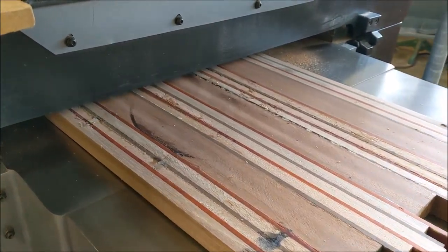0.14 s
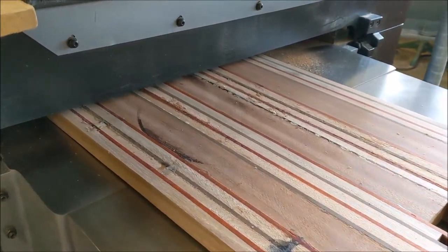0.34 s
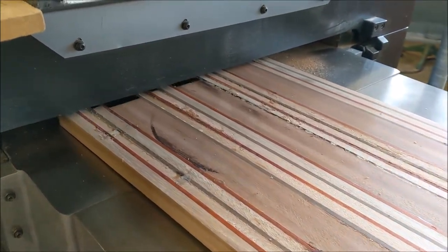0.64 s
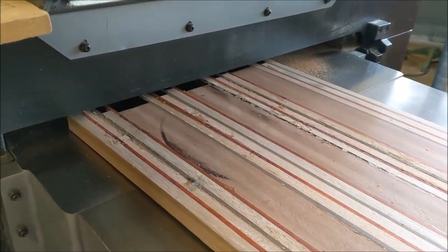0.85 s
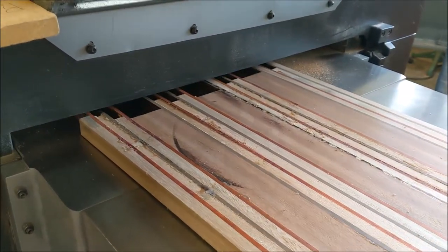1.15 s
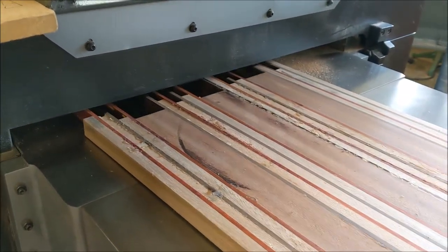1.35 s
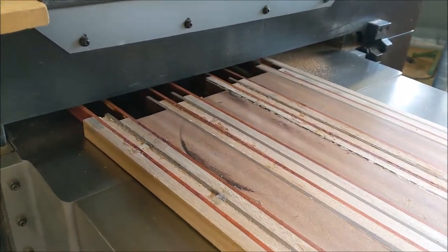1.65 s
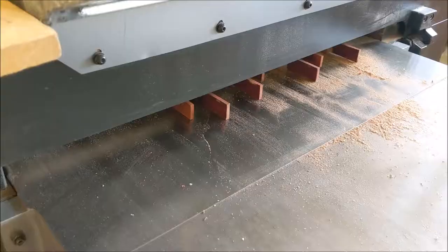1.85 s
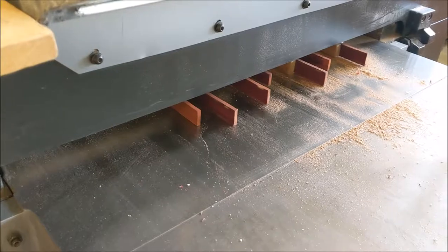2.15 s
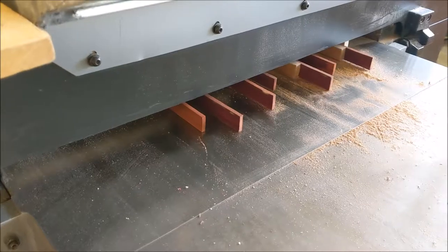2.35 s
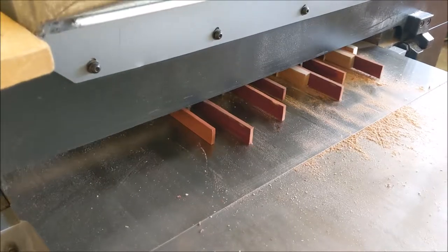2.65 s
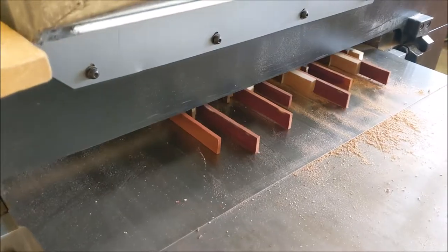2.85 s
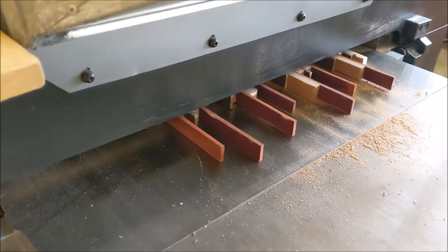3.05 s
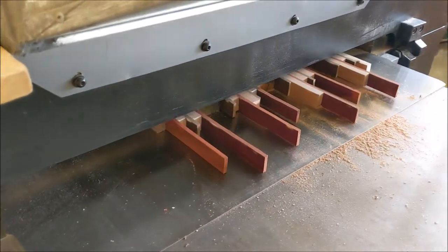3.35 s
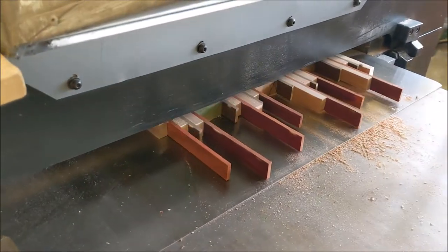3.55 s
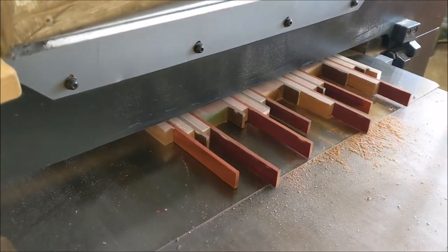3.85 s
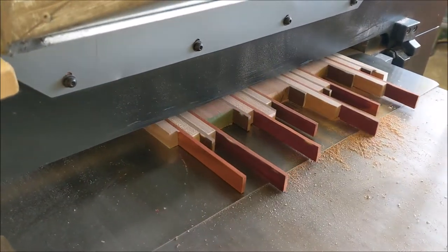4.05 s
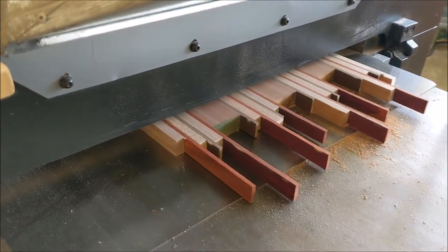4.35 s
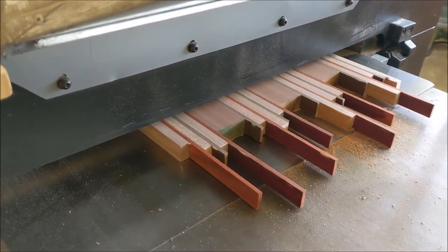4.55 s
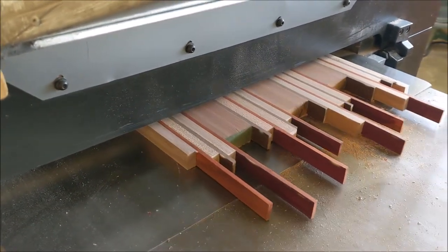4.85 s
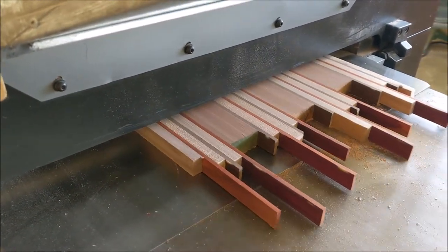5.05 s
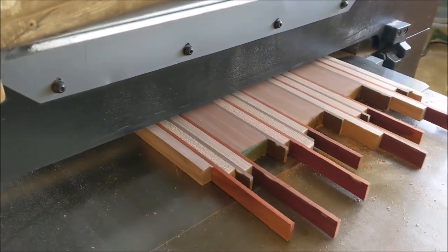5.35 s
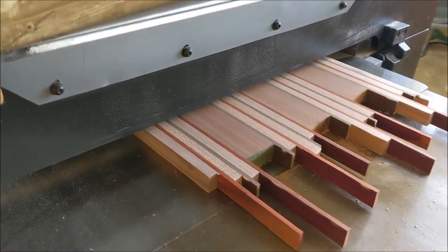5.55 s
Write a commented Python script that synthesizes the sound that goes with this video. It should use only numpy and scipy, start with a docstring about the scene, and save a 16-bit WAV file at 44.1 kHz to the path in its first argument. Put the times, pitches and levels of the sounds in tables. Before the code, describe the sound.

Close at a thickness planer's table in a woodshop, stereo. For almost two seconds it only idles: a broad airy extractor rush, faint motor hum and thin high whistle. A short hollow knock follows, the air dips, and the knives' loud buzzing howl swells in within half a second, then broadens into a fuller, hissier screech as the cut widens, continuing to the end.

```python
"""Thickness planer in a woodshop, heard close by at its table.
It idles: coloured noise for the extractor's air rush, wavering sines for motor, fan and bearings.
At 1.84 s a short hollow ping (decaying sines); the air level dips and a low hum follows.
From 1.85 s the sound of six rows of knives in a glued board swells in, first its end strips, then gradually
its full width: harmonics of the turning rate howl and screech, noise throbbing with the block makes chips hiss."""
import sys
import numpy as np
from scipy import signal
from scipy.fft import rfft, irfft, next_fast_len
from scipy.io import wavfile
from scipy.ndimage import uniform_filter1d, map_coordinates

SR = 44100
rng = np.random.default_rng(int(sys.argv[2]) if len(sys.argv) > 2 else 0)


def output_pcm(signal):
    """Save a mono or channel-first signal as 16-bit PCM at the path in sys.argv[1].

    Samples are clipped to [-1, 1] before scaling.
    """
    pcm = np.clip(np.atleast_2d(signal).T, -1, 1) * 32767
    wavfile.write(sys.argv[1], SR, np.round(pcm).astype(np.int16))


N = 250929
TIME = np.arange(N) / SR
FRAMES = np.linspace(0, N / SR, 300)  # s, slow grid for the line strengths

# noise likeness of left and right: f/Hz, correlation
ALIKE = [(60, 0.77), (150, 0.97), (400, 0.84), (800, 0.74), (1400, 0.66), (3000, 0.35), (6000, 0.079)]
# left-right balance: f/Hz, L-R/dB
LEAN = [(100, -1), (400, 2.5), (1500, 4), (4000, -0.5), (9000, 3), (11500, 1.5), (15000, 8.5)]
# air rush spectrum: f/Hz, relative density/dB
AIR = [(20, -31), (55, -12.5), (90, -14), (170, -12), (260, -5), (430, -3), (580, -8.5), (950, -9),
       (1300, -14.5), (2200, -13), (3500, -19.5), (4400, -21.5), (4900, -26.5), (6600, -28.5),
       (10500, -33.5), (15500, -38)]
# resonances in the air stream: f/Hz, width/Hz, lift/dB
HOOD = [(5580, 660, 7), (11800, 500, 0), (15100, 1500, 8.5)]
# air past a narrow gap: f/Hz, relative density/dB
WHISTLE = [(6500, -47), (7300, -4.5), (7470, -7), (7580, -1), (7720, 0), (7900, -9), (8200, -5),
           (9200, -35)]
# tones of motor, fan and bearings: f/Hz, relative level/dB, L-R/dB
MOTOR = [(58.6, -65.5, 5), (161, -58.5, 0), (204.6, -55, 1), (252.6, -56, -1), (331.4, -54, -1),
         (488, -48.5, 10), (665.5, -58.5, -6), (954, -57.5, -4), (988, -58.5, 2), (1208, -61, 7),
         (1487, -57.5, -9), (1513, -63.5, -28), (1684, -59.5, 6), (1770, -76, -11), (1890, -77, 3),
         (2220, -59, 0), (3000, -64, 12), (3820, -69, 7)]
# level of the running machine, dips briefly as the cutting sound starts: t/s, level/dB
AIR_LEVEL = [(0, -38.5), (1.835, -37.5), (1.855, -48), (1.93, -54), (2.12, -41), (3, -42.5), (5.69, -42)]
# brief pings: t/s, f/Hz, level/dB, rise/s, t60/s
PINGS = [(1.837, 445, -23, .0015, .15), (1.838, 3400, -46, .004, .3), (1.87, 1170, -28, .008, .06),
         (1.881, 1745, -28, .004, .04)]
# short low hum: t/s, level/dB
HUM = [(1.85, -100), (1.89, -54.5), (2.01, -44), (2.04, -100)]
# speed of the block, slightly slower under load: t/s, rate/(turns/s)
SPEED = [(3.18, 80.8), (3.42, 80.46), (4.35, 80.46), (4.6, 80.78), (4.85, 80.85), (5.3, 80.85),
         (5.55, 80.57)]
# tearing fibres: f/Hz, relative density/dB
TEARING = [(400, -24), (800, -10), (1500, 0), (2000, -2.5), (2500, -8.5), (3100, -10), (4500, -18),
           (8000, -30)]
# chip hiss: f/Hz, relative density/dB
CHIPS = [(1000, -20), (2500, -9), (3200, -3), (4000, -4.5), (4700, -11), (5350, -1), (5800, 5.5),
         (6550, -6), (7700, 0.5), (9000, -5.5), (11000, -2.5), (12000, 0.5), (13200, -3), (15000, 2),
         (15700, -2)]
# share of the cutting noise that recurs a turn later: f/Hz, share
REPEAT = [(800, .3), (2500, .42), (7000, .42), (10000, .28), (15000, .2)]
# lead of the cut's tones at the left port: f/Hz, phase/rad
LEAD = [(100, 0), (500, .5), (1000, 1.2), (1450, 1.4), (1900, .8), (3500, .7), (8000, 1.3)]
# howl lines: order of the turning rate, relative level in strips/dB, in full width/dB, L-R/dB
HOWL = [(3, -21, -12, 0), (4, -13, -10.5, 1), (6, -15, -16, 6), (7, -21, -17, 3), (8, -23, -23, 2),
        (9, -16.5, -22, 4), (10, -13, -21, 4), (11, -12.5, -11, 3), (14, -26, -12.5, 2), (15, -22, -18, 3),
        (17, -9.5, -9.5, 2), (20, -18, -18, 1), (21, -6, -9, -2), (26, -14, -13.5, 3), (27, -13, -20, 1),
        (28, -7, -10.5, 7), (29, -18, -15, 3), (31, -18, -11, -2), (32, -17, -19, 5), (33, -17, -24, -1),
        (34, -13.5, -12.5, 7), (35, -14, -10.5, 4), (37, -20, -18, 2), (38, -24, -19, -1),
        (39, -24, -11, 5), (41, -20, -14, 2), (42, -14, -8.5, 1)]
# singing harmonics, swelling and fading as the board slides; each: t/s, level before swell-in gain/dB
ORDER_12 = [(1.93, -34.5), (2.25, -38), (2.41, -49), (2.73, -45.0), (3.13, -54), (3.37, -42), (4.09, -40.5),
            (4.41, -49), (4.57, -38), (5.13, -29.5), (5.65, -29.5)]
ORDER_13 = [(1.93, -36.5), (2.73, -42), (3.05, -35), (3.13, -45), (3.93, -38.5), (4.33, -41.5),
            (4.57, -36.5), (4.65, -42.0), (5.65, -34.5)]
ORDER_16 = [(1.93, -30), (2.33, -35.5), (2.73, -37), (3.37, -44), (3.69, -40), (4.33, -46), (4.49, -44.5),
            (5.65, -43.5)]
ORDER_18 = [(1.93, -31), (2.17, -32.5), (2.33, -29.5), (2.65, -34.5), (3.05, -25), (3.69, -33.5),
            (3.77, -34.5), (4.01, -34.5), (4.33, -45), (4.65, -27.5), (4.73, -54), (4.89, -37), (5.21, -38),
            (5.65, -33.5)]
ORDER_19 = [(1.93, -40), (2.01, -58), (2.57, -40), (2.97, -41), (3.05, -41.5), (3.85, -36.5), (4.33, -38),
            (4.73, -35.5), (5.65, -40.5)]
ORDER_22 = [(1.93, -38), (2.25, -33.5), (2.57, -44), (2.81, -34), (3.05, -47), (3.45, -39.5), (4.01, -48),
            (4.17, -41.5), (5.65, -85)]
ORDER_23 = [(1.93, -50.5), (2.33, -38), (2.81, -35.5), (2.89, -47), (3.29, -42), (3.53, -58), (5.37, -48),
            (5.65, -40.5)]
ORDER_24 = [(1.93, -45.0), (2.01, -35.5), (2.73, -38), (2.89, -33.5), (3.13, -31.5), (4.09, -52),
            (4.65, -36), (5.13, -45), (5.29, -37.5), (5.65, -48.5)]
ORDER_25 = [(1.93, -42), (2.09, -33), (2.41, -51), (3.77, -44), (4.01, -56.5), (4.17, -54), (4.49, -40),
            (4.57, -59), (5.65, -47)]
ORDER_30 = [(1.93, -38), (2.41, -52), (2.57, -39.5), (3.29, -38.5), (3.53, -50), (4.09, -57), (4.17, -40.5),
            (5.21, -39), (5.65, -45.0)]
ORDER_36 = [(1.93, -44), (2.49, -40), (3.21, -53), (3.29, -40.5), (4.01, -42), (4.49, -36.5), (4.57, -50),
            (5.29, -57), (5.45, -34), (5.65, -48)]
ORDER_40 = [(1.93, -41.5), (3.61, -62.5), (4.09, -41), (4.25, -48.5), (4.49, -42.5), (5.13, -42.5),
            (5.29, -38.5), (5.45, -65), (5.65, -65)]
ORDER_48 = [(1.93, -44), (3.13, -47), (3.29, -38.5), (3.85, -45), (4.25, -37), (4.49, -51), (4.57, -40.5),
            (5.21, -42), (5.65, -43)]
ORDER_70 = [(1.93, -46.5), (3.05, -51), (3.21, -31.5), (3.45, -45), (4.33, -48), (4.49, -32.5), (4.57, -54),
            (4.89, -32.5), (5.37, -37), (5.65, -54)]
ORDER_72 = [(1.93, -44.0), (2.09, -37.5), (2.17, -43), (2.49, -43.5), (3.05, -46.5), (3.13, -40),
            (3.21, -52), (5.29, -41), (5.65, -44)]
ORDER_94 = [(1.93, -60), (2.89, -41), (3.29, -62), (4.41, -50), (4.57, -37), (4.73, -54), (5.65, -51.0)]
# the singers: order, level curve (t/s, level/dB), L-R/dB, left lead/rad
SINGERS = [(12, ORDER_12, -2, 1), (13, ORDER_13, -2, 1.1), (16, ORDER_16, 1, 1.2), (18, ORDER_18, -3, 1.5),
           (19, ORDER_19, 2, 1.1), (22, ORDER_22, 4, 0), (23, ORDER_23, 4, -.4), (24, ORDER_24, 2, 1.6),
           (25, ORDER_25, 3, .2), (30, ORDER_30, 3, 1.6), (36, ORDER_36, 3, .7), (40, ORDER_40, 2, -.7),
           (48, ORDER_48, -5, 2.6), (70, ORDER_70, 3, 2.2), (72, ORDER_72, 0, 0), (94, ORDER_94, 5, 1.3)]
# comb of harmonics under the whine: f/Hz, relative level/dB
SCREECH = [(3500, -18), (4300, -18.5), (4900, -21), (5800, -14), (6500, -22), (7600, -17), (8400, -20.5),
           (10000, -20.5), (11200, -25), (13000, -28), (15000, -24), (15800, -30)]
# whine, high lines that stand out: order, relative level in strips/dB, in full width/dB
WHINE = [(46, -16, -12), (49, -13.5, -17), (50, -15, -20), (52, -15.5, -15), (54, -11.5, -13),
         (58, -12.5, -16), (60, -17, -14.5), (64, -8, -9.5), (66, -12, -7), (69, -12, -8.5),
         (71, -10, -9.5), (73, -14, -11), (75, -9, -14), (76, -13, -11.5), (77, -14, -17), (82, -13, -14.5),
         (84, -15, -18), (88, -13, -10.5), (96, -16, -14.5), (100, -10, -15), (118, -19, -15),
         (120, -17, -18), (130, -15, -19), (148, -24, -14)]

AIR_LEAD_S = .00008  # machine and chip noise reach the left port first
TOP_HZ = 15780
TURN_HZ, KNIVES = 80.8, 6  # usual turns/s of the block; rows of knives
CUT_S, SWELL_IN_S = 1.85, 0.39  # the cutting sound starts; time to full level
SWELL_IN_DB, SWELL_IN_CURVE = 20, 2.17  # its start is this much quieter; power law of the rise
WIDEN_S, WIDEN_LAG_S = 2.67, 0.75  # strips give way to full board; time constant
# (strips, full width): reference level of each layer
HOWL_DB, SCREECH_DB, HISS_DB = (-36, -39), (-46.5, -41.5), (-37, -34.5)
SPRAY_DB = 7  # spray above the hiss reference
FINE_HZ, FINE_DB = 9100, (-4.5, -1.5)  # fine chips hiss above this; their gain (strips, full width)
GRAIN_DB, GRAIN_PER_S = 0.77, 18  # passing grain makes the howl waver
HOWL_SWELL_DB, SCREECH_SWELL_DB = 2, 2.8  # each line comes and goes with the grain
UNEVEN_DB = 2.8  # comb lines meet or miss resonances of the hood
STRIKE_TURNS = .06  # where in a turn the first knife strikes
SMEAR_RAD = 1.7  # scatter of phase steps between orders six apart, from ringing
# where in a turn each layer is strongest
FINE_PEAK_TURNS, COARSE_PEAK_TURNS, SCREECH_PEAK_TURNS = -.04, .12, .2


def amp(db):
    """Decibels to gain."""
    return 10 ** (np.asarray(db) / 20)


def unit(x):
    """x at rms 1."""
    return x / np.sqrt(np.mean(np.abs(x) ** 2) + 1e-20)


def along(points, hz):
    """Interpolates (f/Hz, value) points on a log axis."""
    f, v = np.transpose(points)
    return np.interp(np.log(hz + 1), np.log(f + 1), v)


def curve(rows, at=TIME):
    """Interpolates (t/s, value) points in time."""
    s, value = np.transpose(rows)
    return np.interp(at, s, value)


def lift(peaks, hz):
    """Gain in dB that the resonances add."""
    return sum(db / (1 + (2 * (hz - centre) / width_hz) ** 2) for centre, width_hz, db in peaks)


def pan(lean_db):
    """Left and right gains of mean power 1."""
    pair = amp(np.array([lean_db, -lean_db]) / 2)
    return pair / np.sqrt(np.mean(pair ** 2, axis=0))


def wobble(rate, at=TIME):
    """Smooth random curve, rate knots per second."""
    return map_coordinates(rng.standard_normal(int(N * rate / SR) + 4), [at * rate])


def filtered(x, response):
    """x times a response of frequency."""
    m = next_fast_len(N + SR // 2)
    return irfft(rfft(x, m) * response(np.fft.rfftfreq(m, 1 / SR)), m)[..., :N]


def rush(spectrum, peaks=()):
    """Turbulent stereo noise of rms 1: alike in the bass, nearly unrelated in the treble."""
    def colour(hz):
        angle = np.arccos(np.clip(along(ALIKE, hz), -1, 1)) / 2
        gain = amp(along(spectrum, hz) + lift(peaks, hz))
        return gain * np.array([np.cos(angle), np.sin(angle)])

    mid, side = filtered(rng.standard_normal((2, N)), colour)
    ports = np.array([mid + side, mid - side])
    return unit(filtered(ports, lambda hz: pan(along(LEAN, hz))))


def machine():
    """Air rushes through the hood and whistles faintly, under unsteady motor, fan and bearing tones."""
    tones = 0
    for hz, db, lean_db in MOTOR:
        level = amp(db + 3.4 * wobble(7.8)) * pan(lean_db)[:, None]
        tones = tones + level * np.sin(2 * np.pi * hz * TIME + 0.84 * wobble(8))
    whistle = amp(-18.5 + 1.5 * wobble(15.4)) * rush(WHISTLE)
    air = amp(-1.85) * rush(AIR, HOOD)
    return amp(curve(AIR_LEVEL)) * (air + whistle + amp(41.5) * tones)


def pings(hum_hz=46):
    """Decaying sines: hollow ping, thin high ring, two tiny blips; then a low hum."""
    out = amp(curve(HUM)) * np.sin(2 * np.pi * hum_hz * TIME)
    for s, hz, db, rise_s, t60_s in PINGS:
        t = np.maximum(TIME - s, 0)
        envelope = amp(db - 60 * t / t60_s) * (1 - np.exp(-t / rise_s))
        out += envelope * np.sin(2 * np.pi * hz * t)
    return out


def speed():
    """Turns per second of the block, with a slight flutter."""
    return curve(SPEED) + 0.016 * wobble(15)


def swell_in(at):
    """Gain in dB while the cutting sound swells in; 0 at full level."""
    return -SWELL_IN_DB * np.clip(1 - (at - CUT_S) / SWELL_IN_S, 0, 1) ** SWELL_IN_CURVE


def width(at):
    """Cut width, relaxing from the strips (0) to the full board (1)."""
    return 1 - np.exp(-np.maximum(at - WIDEN_S, 0) / WIDEN_LAG_S)


def widened(levels_db, at):
    """Level in dB between strips and full width."""
    strips_db, full_db = levels_db
    return strips_db + (full_db - strips_db) * width(at)


def cut_level(levels_db, at):
    """Layer level in dB, following the swell-in and the width of the cut."""
    return widened(levels_db, at) + swell_in(at)


def throb(cycles, depth_db, rise=0.16):
    """One level swing of +-depth_db a cycle, peaking at whole cycles: quick rise, slower fall."""
    return unit(amp(depth_db * np.interp((cycles + rise) % 1, [0, rise, 1], [-1, 1, -1])))


def patchy(x, depth_db):
    """Narrow bands of x swell and fade on their own."""
    z = signal.stft(x, nperseg=512)[2]
    field = uniform_filter1d(rng.standard_normal(z.shape[1:]), size=4, axis=0)
    field = uniform_filter1d(field, size=22, axis=1)
    return unit(signal.istft(z * amp(depth_db * unit(field)), nperseg=512)[1][:, :N])


def recurring(noise, turns):
    """Knives tear the same fibres turn after turn: noise partly repeats, locked to the block."""
    def comb(hz):
        share = along(REPEAT, hz)
        return np.sqrt(1 - share ** 2) / (1 - share * np.exp(-2j * np.pi * hz / TURN_HZ))

    where = [turns * SR / TURN_HZ]  # samples; warps the fixed period to the block's angle
    ports = [map_coordinates(port, where, order=5, mode="mirror") for port in filtered(noise, comb)]
    return unit(np.array(ports))


def chips(turns, burst_db=0.7, gust_db=0.82, tearing_db=-0.5):
    """Fibres tear at every bite; chips spray against the hood, brighter as the cut widens."""
    howl_db, hiss_db = cut_level(HOWL_DB, TIME), cut_level(HISS_DB, TIME)
    bites = KNIVES * (turns - STRIKE_TURNS)

    tearing = recurring(patchy(rush(TEARING), depth_db=2), turns)
    tearing = tearing * throb(bites, depth_db=1.5) * throb(turns - SCREECH_PEAK_TURNS, depth_db=1.8)

    # chip flow flutters differently on each side of the hood
    gusts_db = .5 * wobble(24) + gust_db * np.array([wobble(22), wobble(22)])
    hiss = recurring(patchy(rush(CHIPS), depth_db=1.4), turns)
    spray = unit(hiss * amp(burst_db * wobble(900) + gusts_db))

    fine = filtered(spray, lambda hz: 1 - 1 / (1 + (hz / FINE_HZ) ** 10))
    coarse = (spray - fine) * throb(turns - COARSE_PEAK_TURNS, depth_db=2.4, rise=.35)
    fine = fine * throb(turns - FINE_PEAK_TURNS, depth_db=2.5)
    spray = (coarse + fine * amp(widened(FINE_DB, TIME))) * throb(bites, depth_db=.4)
    return amp((howl_db + hiss_db) / 2 + tearing_db) * tearing + amp(hiss_db + SPRAY_DB) * spray


def knife_phases():
    """Related phases six orders apart: six unequal blows a turn, smeared by the board's ringing."""
    steps = rng.normal(-2 * np.pi * KNIVES * STRIKE_TURNS, SMEAR_RAD, size=(33, KNIVES))
    return (rng.uniform(0, 2 * np.pi, KNIVES) + np.cumsum(steps, axis=0)).ravel()


def arrival(order, spread):
    """Left lead of an order in rad; reflections shift each line differently."""
    return along(LEAD, order * TURN_HZ) + spread * rng.normal()


def partial(order, level_db, lean_db, lead, phase, unrest, rate):
    """Order and its complex strength per port and frame; passing grain makes it drift."""
    def drift():
        return wobble(rate, FRAMES) + 1j * wobble(rate, FRAMES)

    shared = np.exp(1j * phase) + unrest * drift()
    ports = [unit(shared + unrest * drift() / 2) * np.exp(1j * side * lead) for side in (.5, -.5)]
    return order, amp(level_db) * pan(lean_db)[:, None] * np.array(ports)


def revolve(partials, turns, size=4096):
    """Builds the wave of one turn for each frame and plays it at the angle of the block."""
    lines = np.zeros((2, len(FRAMES), size // 2 + 1), complex)
    for order, strength in partials:
        lines[:, :, order] += strength
    waves = irfft(lines, size) * size / np.sqrt(2)  # unit strength = rms 1
    waves = np.concatenate([waves, waves[..., :1]], axis=-1)  # close the turn
    where = [TIME / FRAMES[1], turns % 1 * size]
    return np.array([map_coordinates(w, where, order=1, mode="nearest") for w in waves])


def howl(turns, phases):
    """Knife blows shake the board; colour shifts as the cut widens, a few harmonics sing out."""
    howl_db = cut_level(HOWL_DB, FRAMES) + GRAIN_DB * wobble(GRAIN_PER_S, FRAMES)
    lines = []
    # unrest grows with order: short waves feel the grain most
    for k, strips_db, full_db, lean_db in HOWL:
        swell_db = HOWL_SWELL_DB * wobble(5.02, FRAMES)
        level_db = howl_db + widened((strips_db, full_db), FRAMES) + swell_db
        lead = arrival(k, spread=.45)
        lines.append(partial(k, level_db, lean_db, lead, phases[k], unrest=.06 + k / 220, rate=11))
    for k, level, lean_db, lead in SINGERS:
        level_db = curve(level, FRAMES) + swell_in(FRAMES)
        lines.append(partial(k, level_db, lean_db, lead, phases[k], unrest=k / 240, rate=18))
    return revolve(lines, turns)


def screech(turns, phases):
    """Sharp edges excite high orders: a dense, buzzing comb with whining lines standing out."""
    edge_db = cut_level(SCREECH_DB, FRAMES)
    singing = [round(row[0]) for row in SINGERS]
    levels_db = {k: along(SCREECH, k * TURN_HZ) + UNEVEN_DB * rng.normal()
                 for k in range(43, 195) if k not in singing}
    for k, strips_db, full_db in WHINE:
        levels_db[k] = widened((strips_db, full_db), FRAMES)

    lines = []
    for k, db in levels_db.items():
        level_db = edge_db + db + SCREECH_SWELL_DB * wobble(9, FRAMES)
        lean_db = along(LEAN, k * TURN_HZ) + 2 * rng.normal()
        lead = arrival(k, spread=1.3)
        lines.append(partial(k, level_db, lean_db, lead, phases[k], unrest=k / 280, rate=18))
    return revolve(lines, turns) * throb(turns - SCREECH_PEAK_TURNS, depth_db=2.6)


def scene():
    """Running machine, pings, then the cut; machine and chip noise reach the left port first."""
    turns, phases = np.cumsum(speed()) / SR, knife_phases()
    engaged = np.interp(TIME - CUT_S, [-.015, .01], [0, 1])
    sides = np.array([[1], [-1]])
    noise = machine() + engaged * chips(turns)
    noise = filtered(noise, lambda hz: np.exp(1j * np.pi * hz * AIR_LEAD_S * sides))
    return noise + pings() + engaged * (howl(turns, phases) + screech(turns, phases))


def record(dry):
    """Sharp band limit: nothing at or above TOP_HZ."""
    return filtered(dry, lambda hz: hz < TOP_HZ)


dry = scene()
out = record(dry)
output_pcm(out)
```